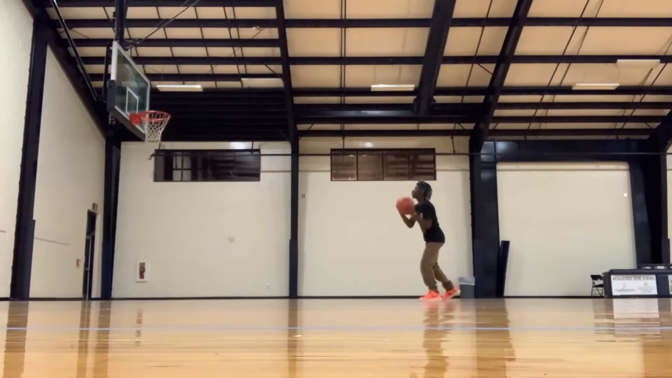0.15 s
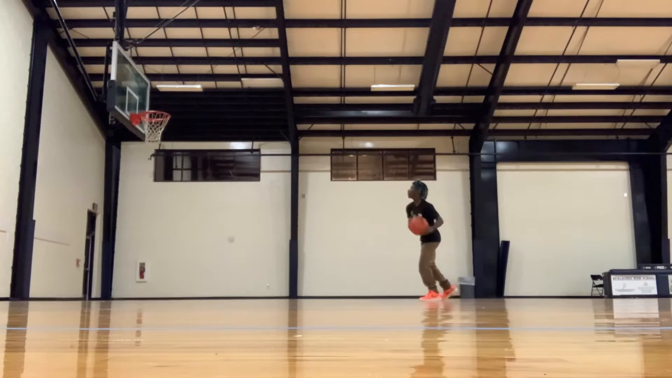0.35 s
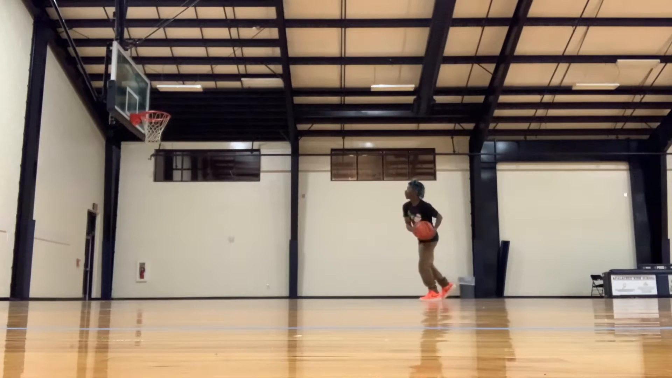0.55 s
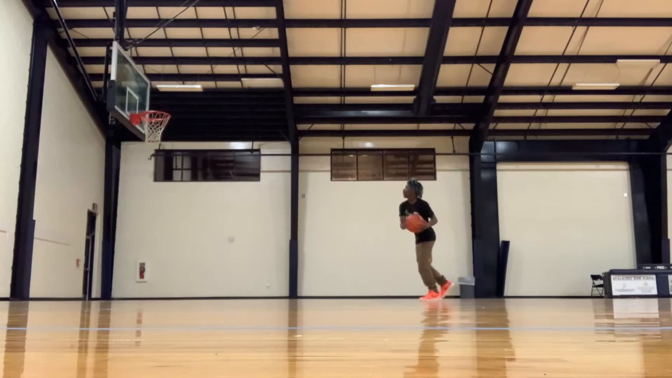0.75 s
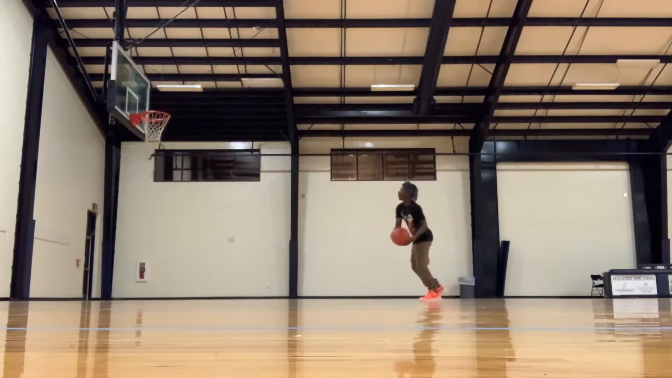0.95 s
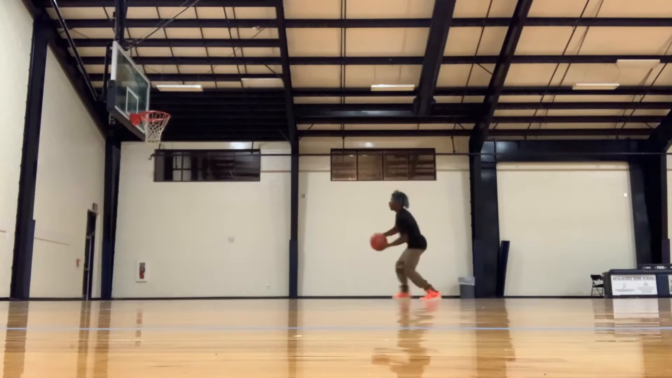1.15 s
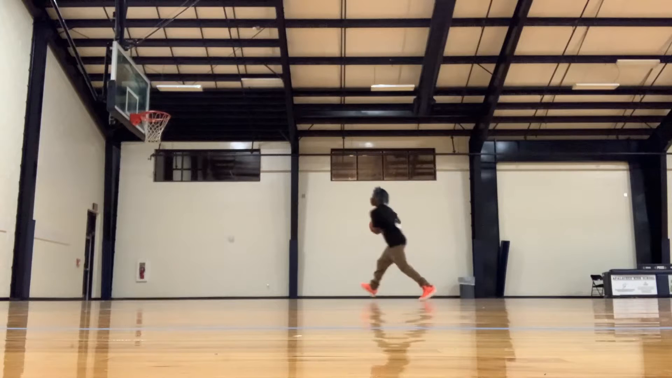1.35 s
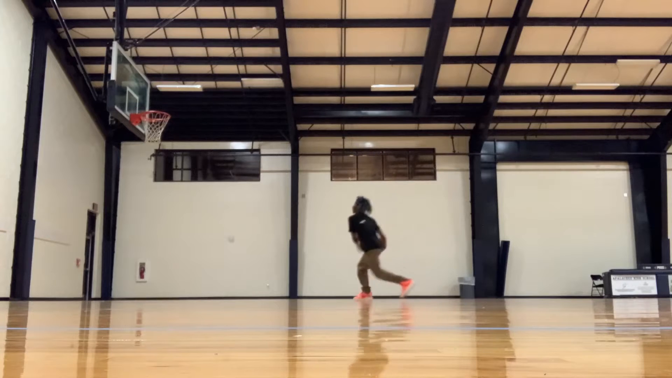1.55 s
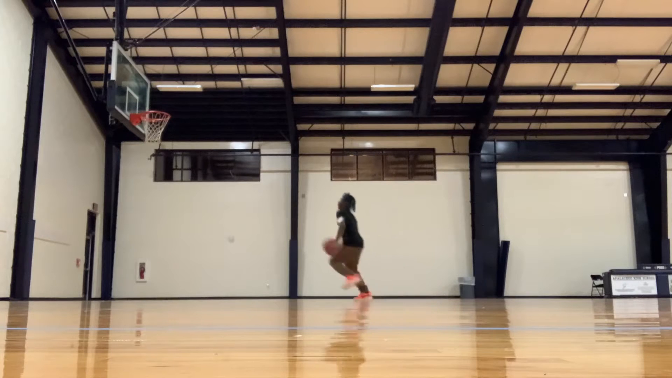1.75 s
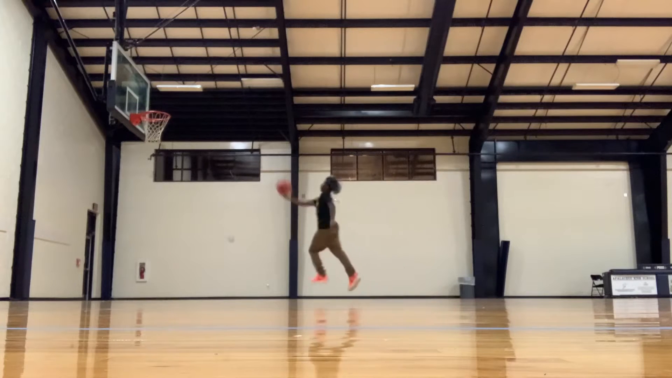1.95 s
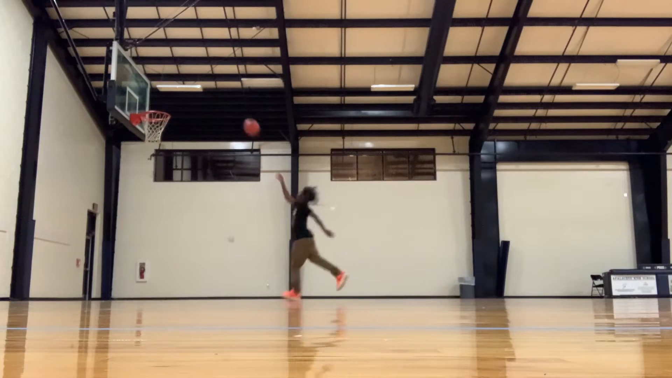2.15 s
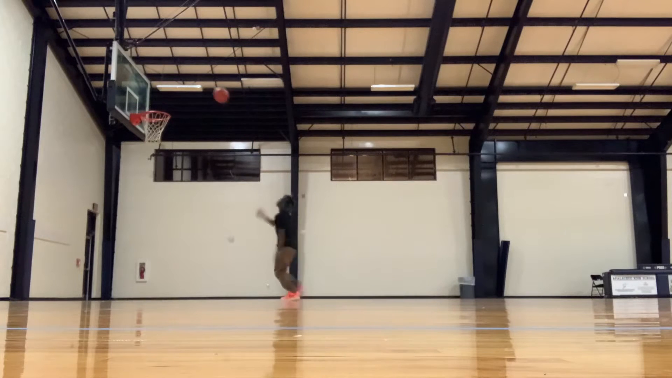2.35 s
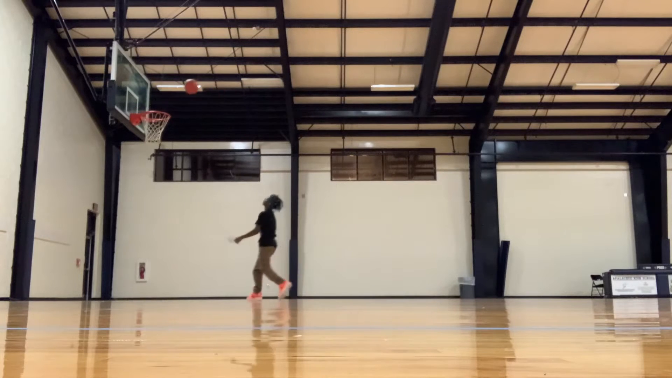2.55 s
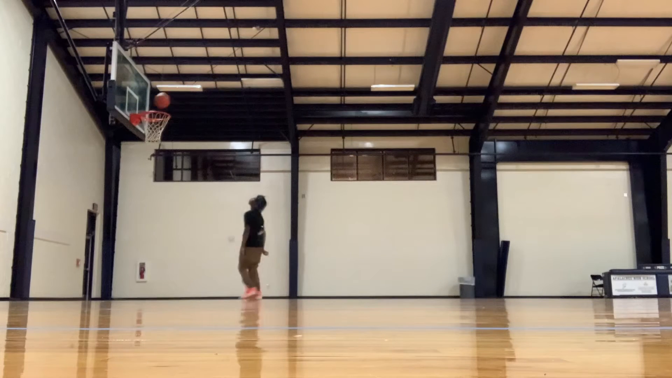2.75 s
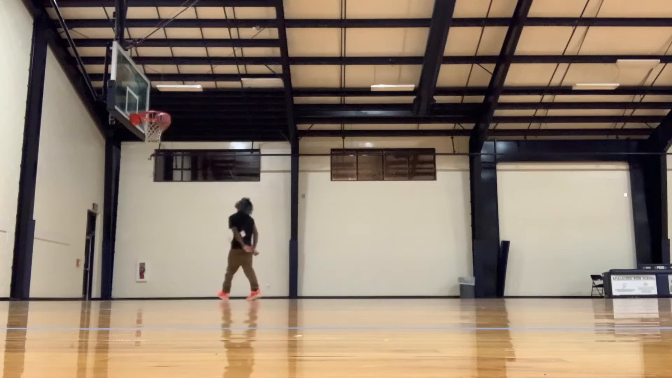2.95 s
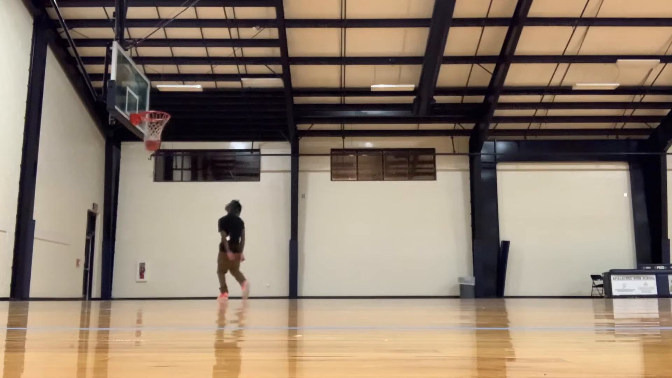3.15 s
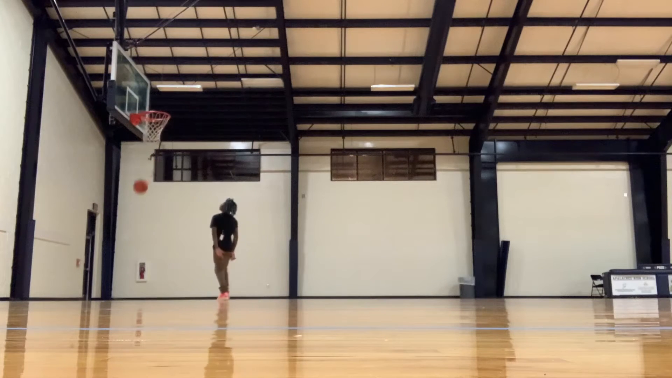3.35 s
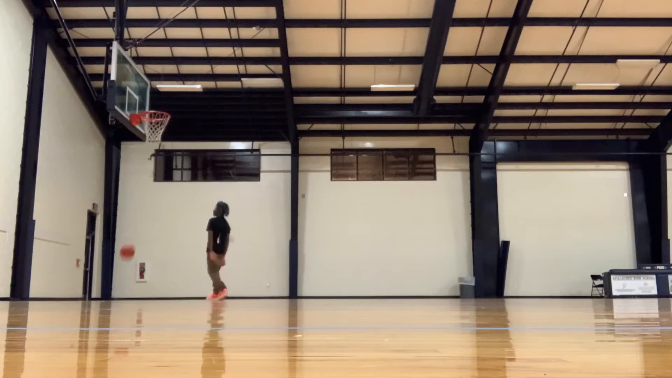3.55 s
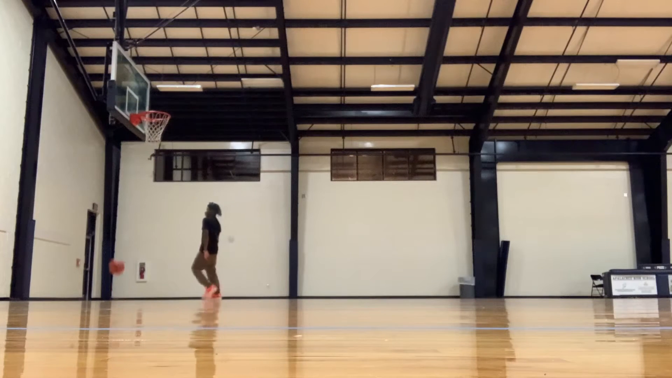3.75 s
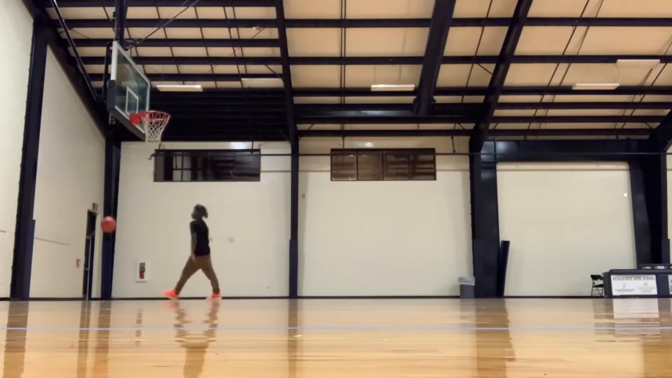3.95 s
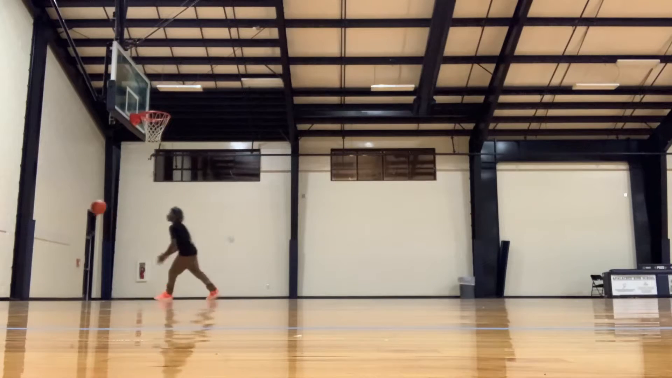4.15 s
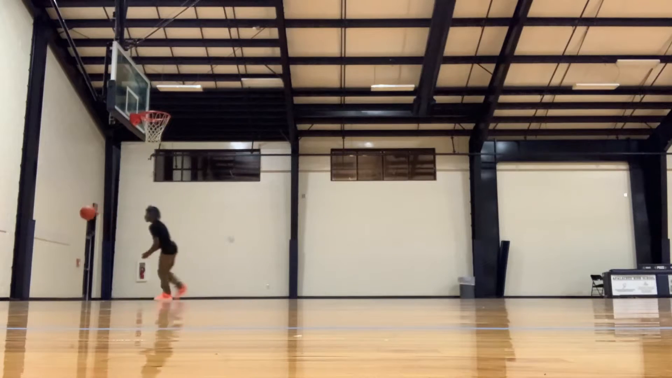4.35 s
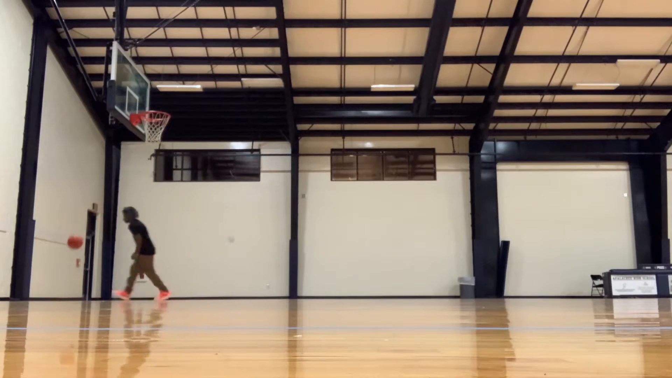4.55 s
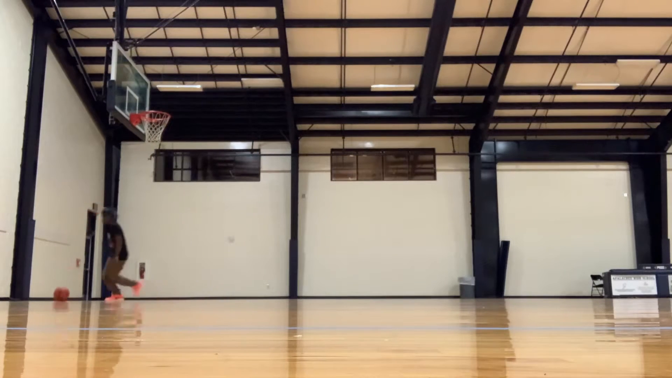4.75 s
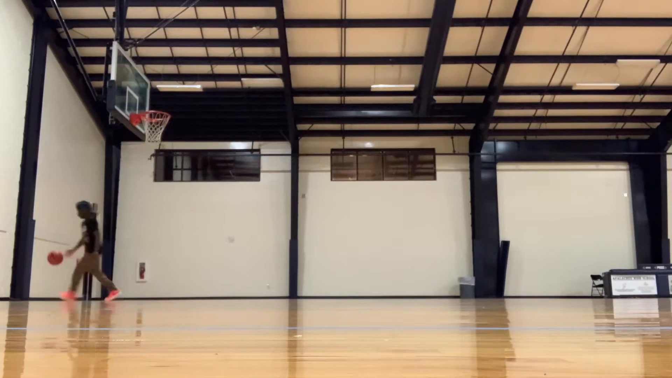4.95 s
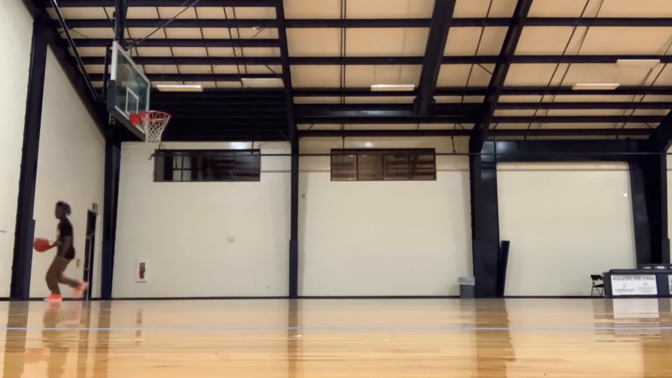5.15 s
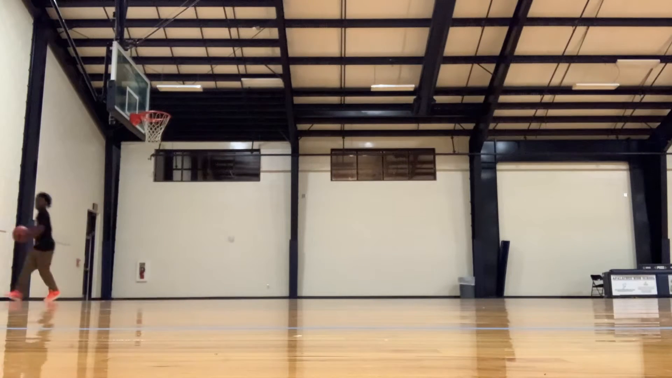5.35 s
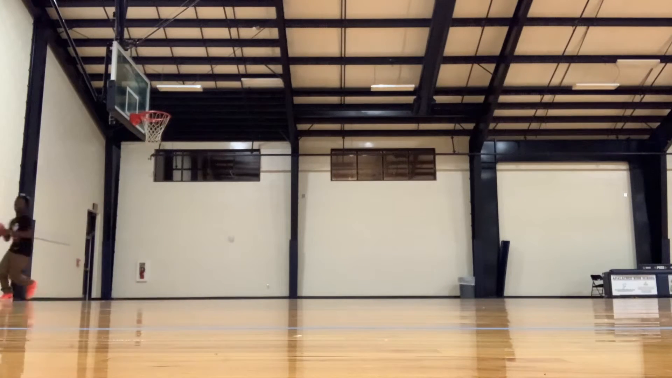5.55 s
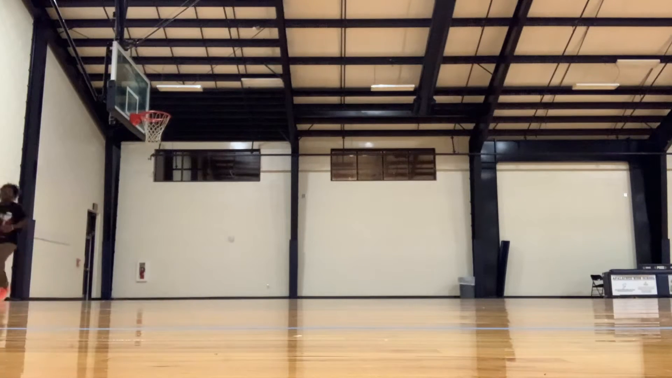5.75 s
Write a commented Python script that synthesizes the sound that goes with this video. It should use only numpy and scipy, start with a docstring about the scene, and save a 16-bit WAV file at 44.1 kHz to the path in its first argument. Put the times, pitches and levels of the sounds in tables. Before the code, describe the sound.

A basketball player dribbles once, jumps and shoots; the hoop thuds and rattles softly, and the ball's loud floor bounces ring through a hollow hall.

```python
"""A low rumble and hiss fade from an earlier bounce over a steady hum, then come footsteps and a bouncing ball.
A player dribbles, jumps, shoots and fetches the ball in a big empty gym with a sprung wooden floor.
Every blow is a crack, a ring and a slightly late floor thump; a near and a far wall echo it, then the hall rings on.
The hoop frame is shaking filtered noise, the squeaking sole is a few wavering high tones,
scuffs and net are short swells of noise, and the ventilation is steady coloured noise."""
import sys
import numpy as np
from scipy import signal
from scipy.fft import rfft, irfft
from scipy.io import wavfile
from scipy.ndimage import uniform_filter1d

SR = 44100
rng = np.random.default_rng(int(sys.argv[2]) if len(sys.argv) > 2 else 0)


def bounce(signal):
    """Save signal as a 16-bit WAV file at the path given by the first command-line argument."""
    frames = np.transpose(np.atleast_2d(signal))
    limited = np.clip(frames, -1, 1)
    pcm = np.round(limited * 32767).astype(np.int16)
    wavfile.write(sys.argv[1], SR, pcm)


N = 255339  # length in samples

# Blows of the ball, the shoes and the hoop. Each row: start in seconds, floor thump pitch in Hz, thump level in dB,
# knock pitch in Hz, knock level in dB, ring level in dB, ring tilt in dB per octave, crack pitch in Hz,
# crack level in dB, fizz level in dB, near wall echo delay in ms, its level in dB,
# far wall echo delay in ms, its level in dB. The near echo comes sooner as play moves toward that wall.
BALL_BLOWS = [(1.492, 145.5, -28, 528, -33, -32.5, -1, 2650, -31.5, -52.5, 26.8, 0.5, 70, -4.5),
              (1.720, 163, -48, 1570, -55.5, -55.5, 17, 3700, -34, -39, 24.6, -1, 71.5, -2.5),
              (3.683, 126.7, -20, 238, -39, -19, -9, 3850, -23.5, -28.5, 13.5, -1.5, 66, -9.5),
              (4.215, 127, -54.5, 2600, -36, -40, -7, 3900, -32, -42, 13, -9, 68, -6),
              (4.780, 109.5, -21.5, 262, -49, -23, 0.5, 3580, -26, -31.5, 12, -2.5, 55, -7.5),
              (5.390, 171, -39, 398, -39.5, -30, -2, 3530, -29.5, -32.5, 11.6, 2, 65, -6)]
SHOE_BLOWS = [(1.124, 167, -35.5, 235, -48, -54, -3, 2400, -46, -68, 28, -2, 73.2, -14),
              (1.453, 146, -32, 360, -59, -54, -1.7, 2800, -59, -71, 27, -2, 74, -3),
              (1.697, 108, -34, 217, -54.5, -66, -1.5, 5800, -44, -50.5, 23, 12, 70.5, -15),
              (2.165, 138, -27.5, 214, -40, -37, -0.47, 2520, -40, -53, 25.6, -8.5, 66.4, -16),
              (2.427, 166, -33.5, 1370, -52, -54, 2, 3400, -46, -61, 41, -26, 70.4, -23),
              (2.459, 241, -38, 1320, -47.5, -58, 1.8, 3500, -43, -55.5, 24, -0.5, 68, -32),
              (2.756, 106, -47, 500, -83, -46.5, -1.3, 1690, -44.5, -70, 23, -0.5, 68.3, -10),
              (2.788, 122, -51, 250, -79, -68, -1.7, 1840, -45.5, -67, 16.4, -3, 63.5, -12)]
HOOP_BLOWS = [(2.880, 90, -35.5, 397, -55, -40.5, 0.6, 2930, -46.5, -60, 23, -4.5, 59.7, -8.5),
              (2.912, 89, -30, 388, -43.5, -68, -1.5, 2030, -70, -80, 9.2, -22, 59.6, -26),
              (2.998, 80.8, -53, 260, -54, -44, -0.27, 1940, -55, -49, 22, -21, 62.4, -13)]
# The tones that ring in each thing. Each row: pitch in Hz, level in dB, time to fade by 60 dB in seconds.
BALL_TONES = [(750, 3.5, 0.0065), (834, -12.5, 0.073), (912, -5, 0.023), (1134, -1, 0.012),
              (1368, 3.5, 0.02), (1306, -20.5, 0.11), (1836, -12, 0.019), (2580, -13, 0.012),
              (2970, -11, 0.0098), (3400, -16, 0.02)]
SHOE_TONES = [(552, 5, 0.01), (1015, 11.5, 0.0031), (1300, 10, 0.0063), (1610, -8.5, 0.024)]
HOOP_TONES = [(367, -17, 0.67), (559, 1, 0.028), (980, 20, 0.0049), (1340, 8.5, 0.016), (1920, -5.5, 0.013)]
# What all blows of a kind share: deep boom in dB above the thump, time for the thump to fade by 60 dB in seconds,
# level of the bass sent to the hall in dB.
BALL_KIND = (-3, 0.085, 1.58)
SHOE_KIND = (-19.5, 0.031, 6.1)
HOOP_KIND = (2.8, 0.036, -4.5)
# How the near wall colours its echo, with a bright peak. Each row: pitch in Hz, level in dB.
NEAR_WALL = [(300, 6), (1000, -5), (2300, 1.5), (3250, 5), (4000, -1), (10000, 2)]
# How long floor and walls scatter a blow: fade by 60 dB in seconds, for the direct, near wall and far wall path.
SCATTER_T60 = (.018, .022, .026)
FAR_WALL_HZ = 5000  # the far echo weakens above this
DIRECT_GAIN_DB = 0


def play_blows(near, sent):
    """Mixes every blow into the near sound, by three paths, and sends it to the hall from one spot after another."""
    far_wall = signal.butter(2, FAR_WALL_HZ, fs=SR, output="sos")
    kinds = ((BALL_BLOWS, BALL_KIND, BALL_TONES),
             (SHOE_BLOWS, SHOE_KIND, SHOE_TONES),
             (HOOP_BLOWS, HOOP_KIND, HOOP_TONES))
    spot = 0
    for blows, (boom_db, thump_t60, bass_db), tones in kinds:
        for (s, thump_hz, thump_db, knock_hz, knock_db, ring_db, tilt_db, crack_hz, crack_db, fizz_db,
             near_ms, near_db, far_ms, far_db) in blows:
            bass, body = blow(tones, thump_db + boom_db, thump_hz, thump_db, thump_t60, knock_hz, knock_db,
                              ring_db, tilt_db, crack_hz, crack_db, fizz_db)
            paths = (body, colour(body, NEAR_WALL)[0], signal.sosfilt(far_wall, body))
            delays_ms = (0, near_ms, far_ms)
            levels_db = (DIRECT_GAIN_DB, near_db, far_db)
            for heard, ms, path_db, t60 in zip(paths, delays_ms, levels_db, SCATTER_T60):
                arrival = bass + scatter(heard, t60)
                add(near, undb(path_db) * arrival, s + ms / 1000)
            add(sent[spot % len(sent)], undb(bass_db) * bass + body, s)
            spot += 1


FIZZ_HZ = 7000  # the fizz lies between this and TOP_HZ


def blow(tones, boom_db, thump_hz, thump_db, thump_t60, knock_hz, knock_db,
         ring_db, tilt_db, crack_hz, crack_db, fizz_db):
    """One contact: a click filtered into crack and knock, ringing tones, and the bass of the floorboards."""
    t = np.arange(SR // 4) / SR
    click = 6.5 * (t == 0)
    crack = undb(crack_db) * band(click, crack_hz / 3.84, crack_hz * 1.346, order=3)
    crack -= undb(fizz_db) * band(click, FIZZ_HZ, TOP_HZ)
    ring = np.zeros(len(t))
    for k, (hz, db, t60) in enumerate(tones):
        tilted_db = db + tilt_db * np.log2(hz / 1000)
        # every other tone starts upside down
        ring += (-1) ** k * undb(tilted_db) * fade(t, t60) * np.sin(2 * np.pi * hz * t)
    squash = 1 - np.exp(-t / .001)  # the ring builds up over about a millisecond
    knock = undb(knock_db) * band(click, knock_hz / 1.21, knock_hz * 1.64)
    body = undb(ring_db) * squash * ring + knock
    # the boards swing up a little after the contact
    swing = 1 - np.exp(-t / .011)
    thump = fade(t, max(thump_t60, .01)) * swing * np.sin(2 * np.pi * thump_hz * t)
    late_click = np.roll(click, SR // 150)
    bass = undb(thump_db) * thump + undb(boom_db) * band(late_click, 42.0, 115.3)
    return bass, body + crack


FIRST_ARRIVAL = 6.5  # how far the first arrival stands above the scatter that follows, as a factor


def scatter(x, t60):
    """Smears a sound over a short ragged burst of reflections scaled to unit energy."""
    t = np.arange(SR // 20) / SR
    burst = rng.standard_normal(len(t)) * fade(t, t60) * (1 - np.exp(-t / 0.00032))
    burst[SR // 4000] = FIRST_ARRIVAL
    return signal.fftconvolve(x, burst / np.sqrt(np.sum(burst ** 2)))[:len(x)]


# The hoop frame shakes after the shot. Each table: start in seconds, rise in seconds,
# time to fade by 60 dB in seconds, level in dB.
RUMBLE = (2.96, .11, 1.2, -45)
RATTLE = (2.93, .09, .4, -43.5)


def shake_hoop():
    """The hoop frame rumbles as low noise and its joints rattle as higher noise in bursts."""
    noise = rng.standard_normal((2, N))
    rumble = swell(*RUMBLE) * band(noise[0], 22, 119)
    rattle = swell(*RATTLE) * band(noise[1] * grain(N, 160, 0.7), 240, 1500)
    return rumble + rattle


def swell(start_s, rise_s, t60, db):
    """A gain that rises smoothly from its start and then dies away."""
    t = np.maximum(np.arange(N) / SR - start_s, 0)
    rise = 1 - np.exp(-(t / rise_s) ** 2)
    return undb(db) * rise * fade(np.maximum(t - rise_s, 0), t60)


# The squeaking sole's tones. Each row: pitch in Hz, amount of waver in Hz, level in dB.
SQUEAK_TONES = [(5632, 26, -42), (5567, 30, -54), (9350, 200, -39.5), (10650, 180, -48), (11181, 70, -52),
                (11270, 70, -47)]
SQUEAK_S, SQUEAK_LONG_S, SQUEAK_DB = 2.507, .12, -0.6  # start and length in seconds, overall level in dB


def squeak():
    """Rubber sticks and slips on varnish: a few high tones that slide up into pitch and waver."""
    size = int(SQUEAK_LONG_S * SR)
    slide = 1 - .015 * np.exp(-np.arange(size) / SR / .015)  # starts 1.5 percent flat
    waver = uniform_filter1d(rng.standard_normal((len(SQUEAK_TONES), size)), size=80) * np.sqrt(80)
    tones = np.zeros(size)
    for (hz, waver_hz, db), drift in zip(SQUEAK_TONES, waver):
        phase = 2 * np.pi * np.cumsum(hz * slide + waver_hz * drift) / SR
        tones += undb(db) * np.sin(phase)
    envelope = np.sin(np.pi * np.linspace(0, 1, size)) ** .4
    return undb(SQUEAK_DB) * tones * envelope * grain(size, 60, .15)


# Swells of noise: a low rumble and hiss fading from an earlier bounce, scuffing soles,
# the rough edge of the squeak, the net.
# Each row: start in seconds, length in seconds, level in dB, centre pitch in Hz, width in Hz.
NOISE_SWELLS = [(.01, 0.49, -77.5, 4220, 3340), (.01, 0.32, -81.5, 1300, 960), (.01, 0.46, -73, 58, 39.7),
                (1.149, 0.37, -68.5, 1900, 1440), (1.202, 0.34, -80, 5200, 3000),
                (1.511, 0.55, -56.5, 3400, 1980), (2.499, 0.022, -47.5, 10800, 1470),
                (2.511, 0.038, -47, 5670, 597), (2.99, 1, -59.5, 3270, 3800),
                (3.011, 0.041, -53.5, 4580, 450), (3.108, 0.05, -51.5, 3160, 600),
                (2.502, 1, -66.5, 4100, 2380), (2.998, 0.13, -55.5, 9200, 6050),
                (4.064, 0.017, -56, 8100, 9400), (5.243, 0.11, -57.5, 7000, 9200),
                (2.96, 0.27, -58.5, 1400, 1420)]


def play_noise_swells(track):
    """Mixes in all the soft noise swells."""
    for s, long_s, db, hz, width_hz in NOISE_SWELLS:
        add(track, noise_swell(long_s, db, hz, width_hz), s)


def noise_swell(long_s, db, hz, width_hz):
    """A band of noise that swells quickly and sinks away slowly."""
    envelope = np.sin(np.pi * np.linspace(0, 1, int(long_s * SR)) ** 0.26) ** 2
    noise = rng.standard_normal(len(envelope))
    return undb(db) * envelope * band(noise, hz - width_hz / 2, hz + width_hz / 2)


# How long the hall rings. Each row: pitch in Hz, time to fade by 60 dB in seconds.
HALL_T60 = [(50, 3.17), (130, 1.32), (250, 1.49), (500, 1.98), (1000, 1.79), (2500, 2.66), (4500, 2.39),
            (7000, 1.85), (10000, 0.58), (12500, 0.67), (15500, 0.097)]
# How the hall colours its ringing. Each row: pitch in Hz, level in dB before HALL_DB is added.
HALL_COLOUR = [(40, -2.5), (120, 3), (200, 5.5), (300, 7.5), (500, -0.5), (800, -1), (1300, -1),
               (1900, 0.5), (2600, 1.5), (3300, 2), (4500, -1.5), (6000, 1.5), (9000, -5.5), (15000, 13)]
HALL_DB, HALL_RISE_S = -34, .015
HALL_GRAIN, HALL_BLEND_S = .55, 0.024  # unevenness of the echo clusters, time constant of their blending


def hall(count):
    """Responses from several floor spots: echoes build up in clusters, blend, and die at each pitch's own rate."""
    hz = np.fft.rfftfreq(1024, 1 / SR)[:, None]
    t = np.arange(240) * 512 / SR
    chance = rng.standard_normal((2, count, 2, len(hz), len(t)), dtype=np.float32)
    shape = undb(along(HALL_COLOUR, hz) + HALL_DB) * fade(t, along(HALL_T60, hz))
    spectrum = (chance[0] + 1j * chance[1]) * shape / 32
    tail = signal.istft(spectrum, nperseg=1024, noverlap=512)[1]
    t = np.arange(tail.shape[-1]) / SR
    clusters = np.array([grain(len(t), 246.3, HALL_GRAIN) for _ in range(count)])[:, None]
    clusters = clusters ** np.exp(-t / HALL_BLEND_S)  # evens out to a gain of 1
    return tail * clusters * (1 - np.exp(-(t / HALL_RISE_S) ** 2))


# The ventilation's colour. Each row: pitch in Hz, relative level in dB per Hz.
AIR_COLOUR = [(15, -47), (25, -6), (114, -2), (285, -19), (335, -10), (416, -27.5), (641, -18), (754, -31),
              (1560, -20), (2050, -34.5), (2990, -26.5), (6050, -38), (8590, -42.5), (13200, -21),
              (16000, -71.5)]
AIR_DB = -74.5  # overall level


def ventilation():
    """Moving air hums steadily: coloured noise, separate for the sum and the difference signal."""
    air = colour(rng.standard_normal((2, N)), AIR_COLOUR)
    return air * undb(AIR_DB) / np.std(air[0])


def undb(db):
    """Turns dB into a plain factor."""
    return 10 ** (np.asarray(db) / 20)


def along(table, hz):
    """Reads (Hz, value) points on a log-frequency axis."""
    f, v = np.transpose(table)
    return np.interp(np.log(np.maximum(hz, 1)), np.log(f), v)


def colour(x, table):
    """Filters by a (Hz, dB) response, made causal through the cepstrum, so nothing sounds early."""
    cepstrum = irfft(np.log(undb(along(table, np.fft.rfftfreq(4096, 1 / SR)))))
    # fold the backward half of time onto the forward half
    cepstrum[1:2048] *= 2
    cepstrum[2049:] = 0
    response = irfft(np.exp(rfft(cepstrum)))
    return signal.oaconvolve(np.atleast_2d(x), response[None], axes=-1)[..., :x.shape[-1]]


def band(x, lo_hz, hi_hz, order=2):
    """Keeps a band of pitches, with unit power gain for noise."""
    hi_hz = min(hi_hz, .45 * SR)
    sos = signal.butter(order, [lo_hz, hi_hz], "band", fs=SR, output="sos")
    return signal.sosfilt(sos, x) * np.sqrt(SR / 2 / (hi_hz - lo_hz))


def add(track, sound, s):
    """Mixes a sound in at s seconds."""
    i = int(s * SR)
    track[i:i + len(sound)] += sound[:len(track) - i]


def fade(t, t60):
    """Dies away by 60 dB in t60 seconds."""
    return np.exp(-np.log(1000) * t / t60)


def grain(size, rate, depth):
    """A gain that moves between random levels, rate times a second, with mean power 1."""
    k = int(SR / rate)
    steps = np.repeat(rng.standard_normal(size // k + 1), k)
    gain = np.exp(depth * uniform_filter1d(steps, k // 2)[:size])
    return gain / np.sqrt(np.mean(gain ** 2))


def scene():
    """Sum and difference signals of a microphone pair on the floor: near sounds, hall and ventilation."""
    rooms = hall(count=5)
    near = np.zeros(N)
    sent = np.zeros((len(rooms), N))
    play_blows(near, sent)
    soft = shake_hoop()
    play_noise_swells(soft)
    add(soft, squeak(), SQUEAK_S)
    near += soft
    sent[0] += soft
    wet = signal.fftconvolve(sent[:, None], rooms, axes=-1)[..., :N].sum(axis=0)
    # a direct sound reaches one microphone first, so the difference comes a little late (6 samples)
    direct = np.array([near, undb(-7.0) * np.roll(near, 6)])
    return direct + wet + ventilation()


# Tone curves for the sum and the difference signal: the sum is hollow near 9 kHz,
# the difference weak above 11 kHz. Each row: pitch in Hz, level in dB.
SUM_TONE = [(30, -9), (60, 15.5), (1400, 5), (1750, 4.5), (2900, 1.5), (3500, 0), (6500, 0.5), (7600, -1),
            (8300, -15), (9400, -24.5), (10600, -6.5), (15000, -8.5)]
DIFFERENCE_TONE = [(30, -37.5), (60, 2), (125, 4), (250, 8.5), (500, 9), (1000, 7.5), (2000, 3.5),
                   (5000, 0), (9000, 1.5), (11000, -10), (12500, -25), (15000, -36)]
# How much of the sum signal leaks into the difference. Each row: pitch in Hz, level in dB.
LEFT_SHARE = [(30, 1), (200, -13.5), (500, -10), (2000, -89), (8000, 6)]
LEFT_DB = 0.13  # how much the left gain exceeds the right
TOP_HZ = 15900  # steep cut above this


def record(dry):
    """Colours the sum and difference, turns them into left and right, and cuts the top steeply."""
    mid = colour(dry[0], SUM_TONE)[0]
    leak = colour(dry[0], LEFT_SHARE)[0]
    side = colour(dry[1] + leak, DIFFERENCE_TONE)[0]
    left = (mid + side) * undb(LEFT_DB / 2)
    right = (mid - side) * undb(-LEFT_DB / 2)
    top_cut = signal.ellip(8, .2, 70, TOP_HZ, fs=SR, output="sos")
    return signal.sosfilt(top_cut, np.array([left, right]))


dry = scene()
out = record(dry)
bounce(out)
```